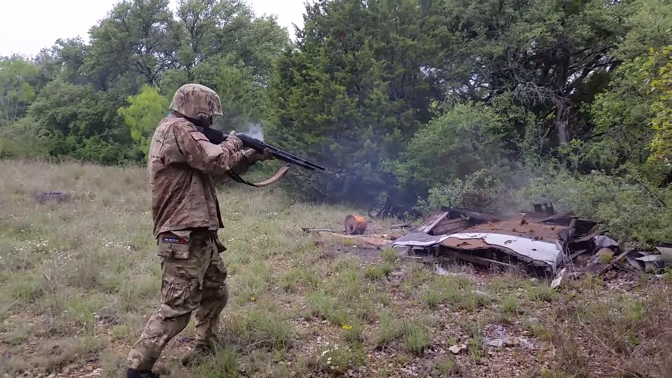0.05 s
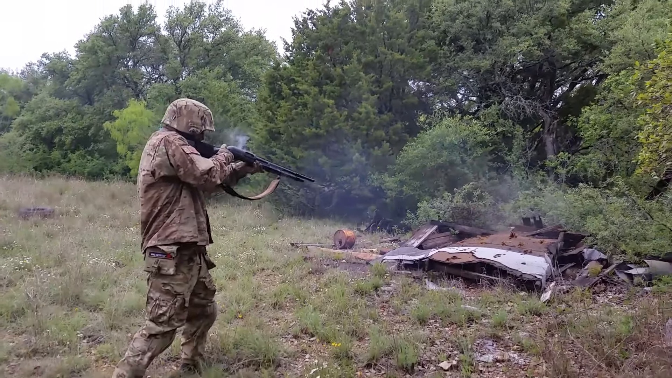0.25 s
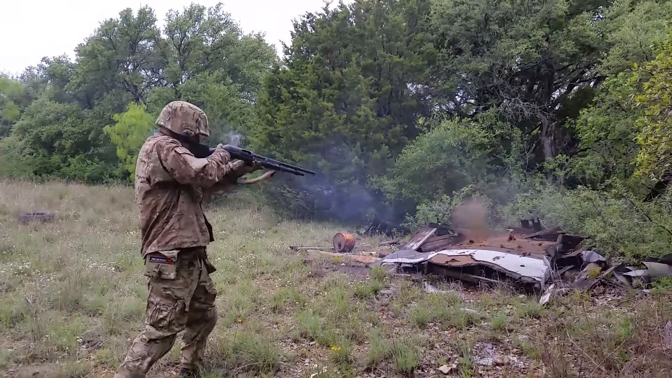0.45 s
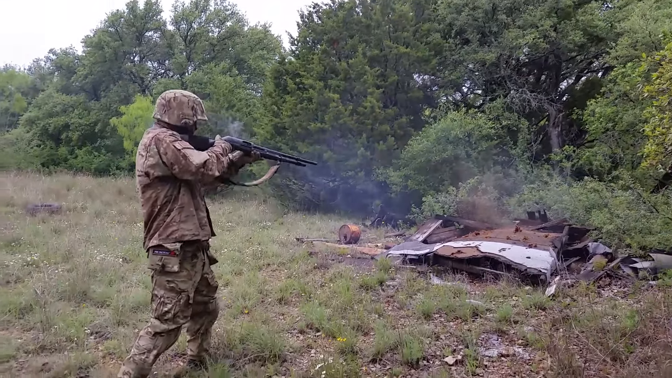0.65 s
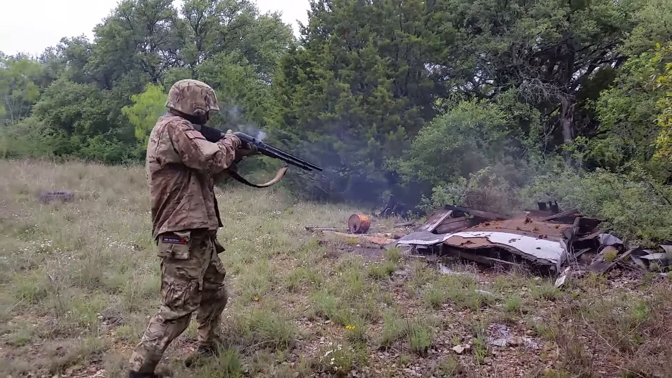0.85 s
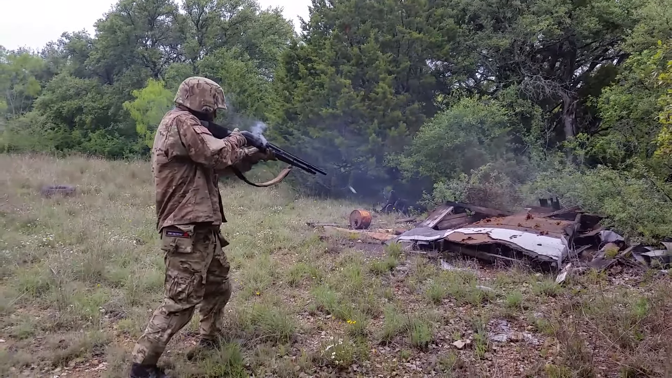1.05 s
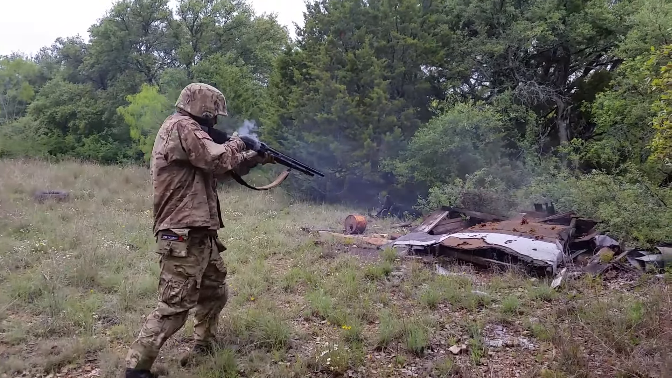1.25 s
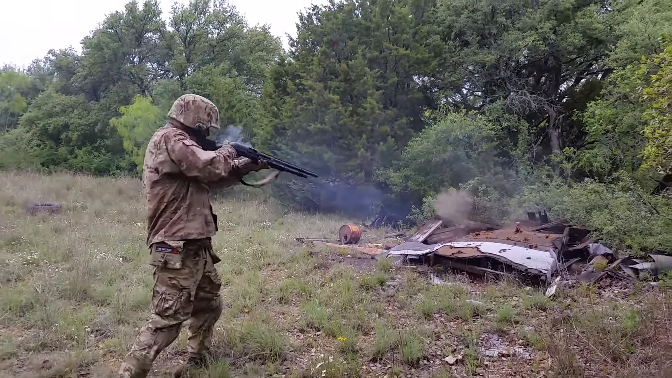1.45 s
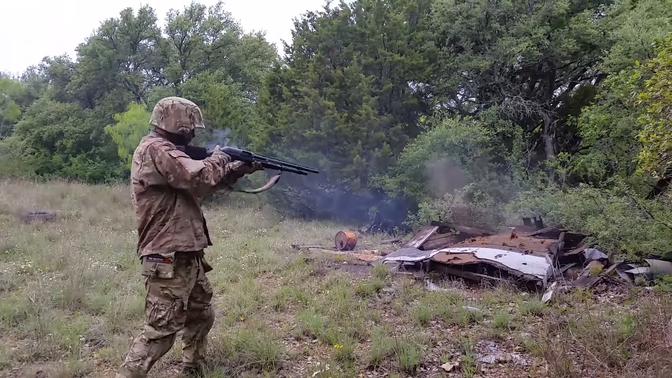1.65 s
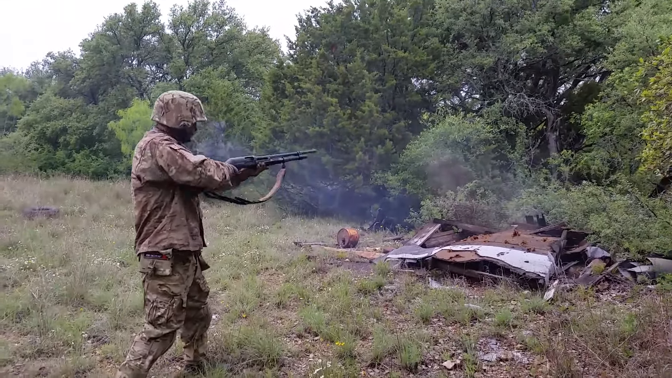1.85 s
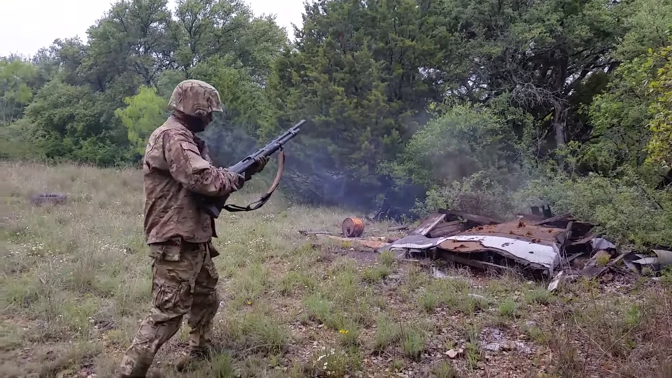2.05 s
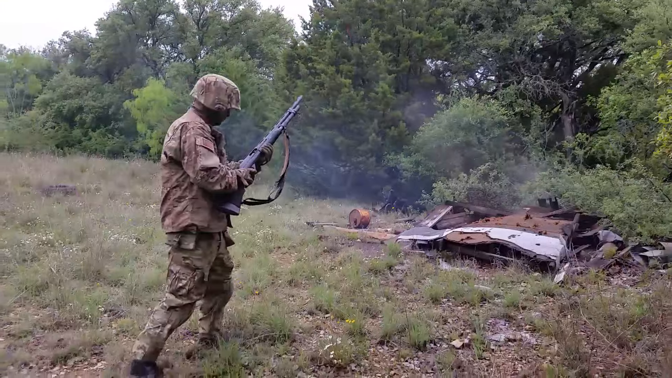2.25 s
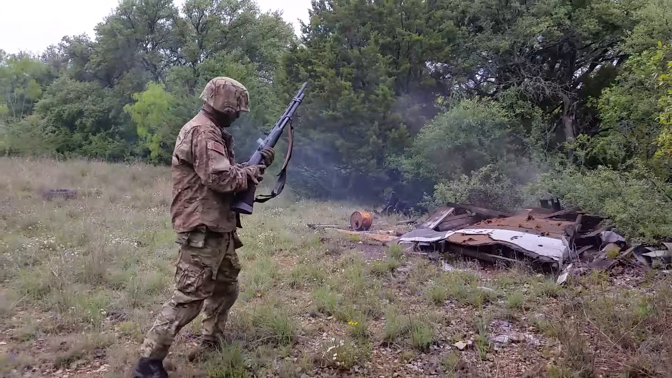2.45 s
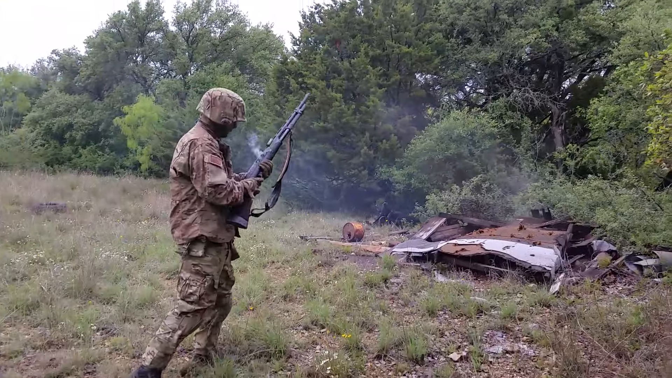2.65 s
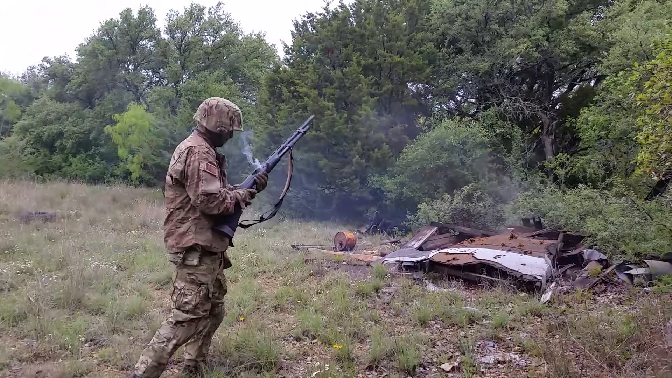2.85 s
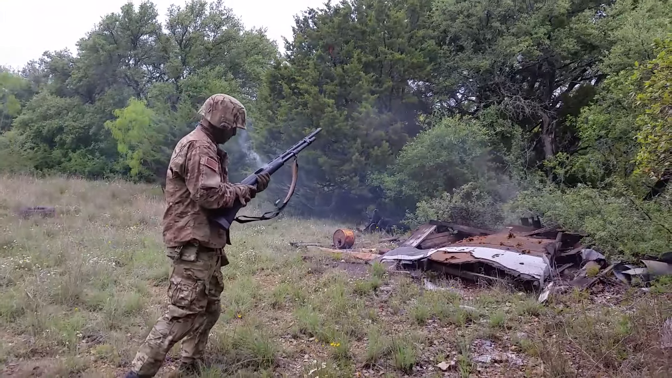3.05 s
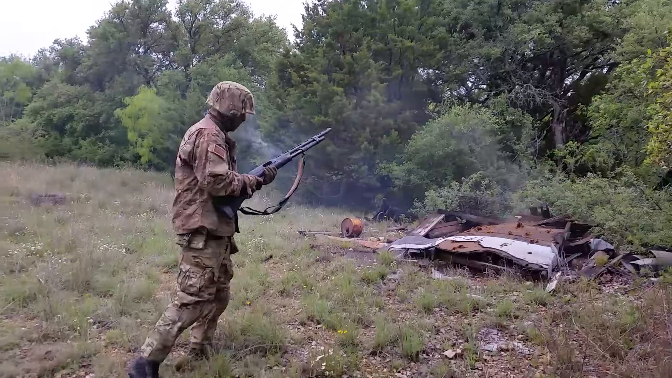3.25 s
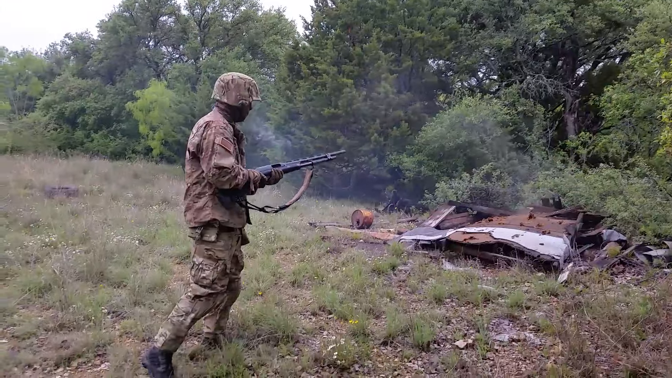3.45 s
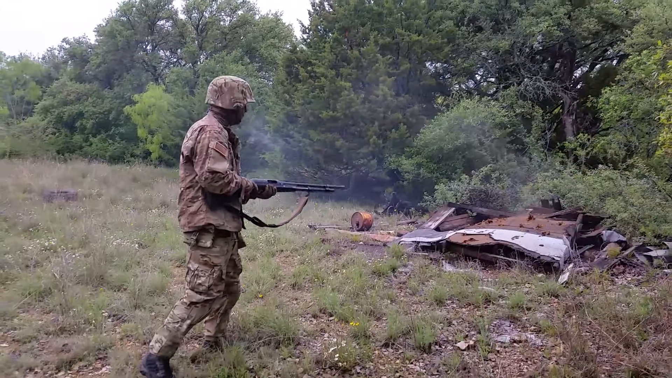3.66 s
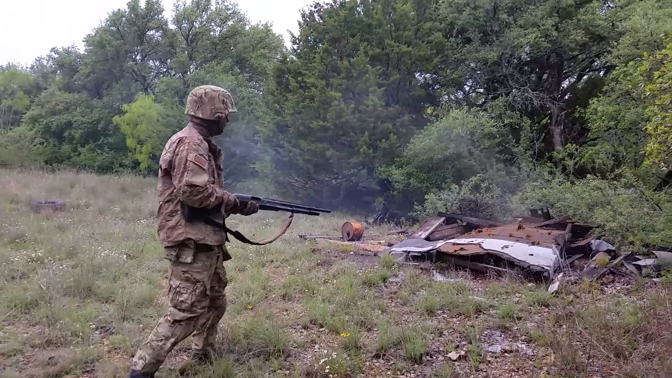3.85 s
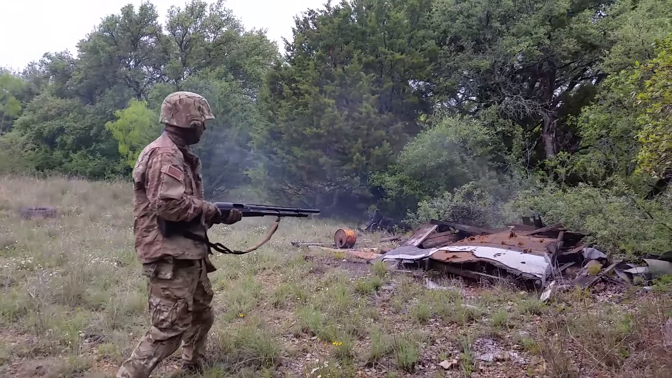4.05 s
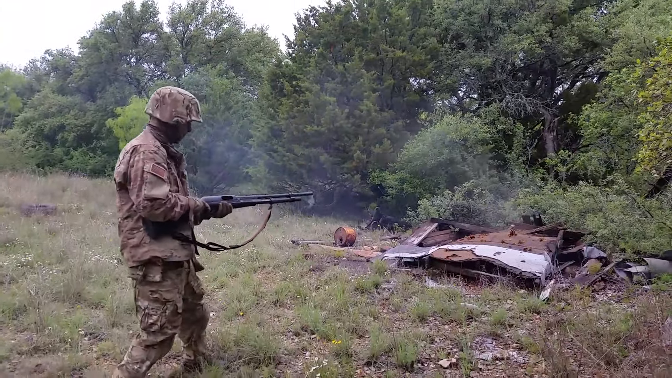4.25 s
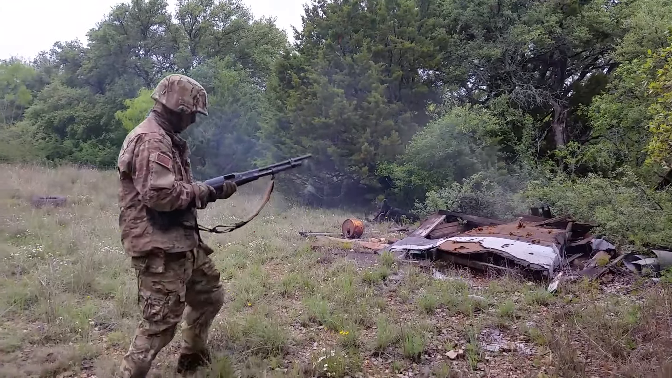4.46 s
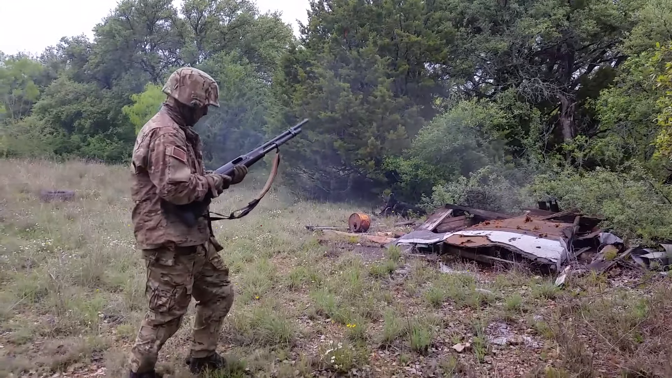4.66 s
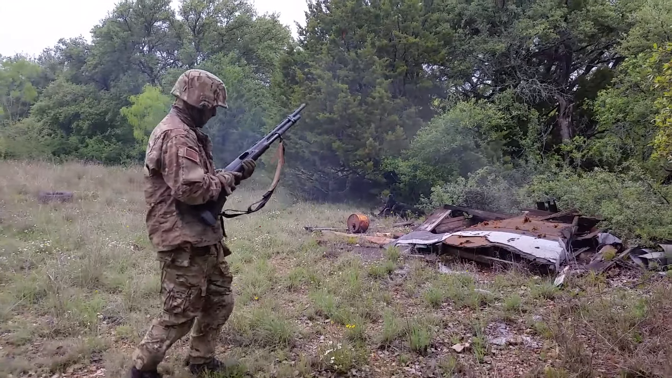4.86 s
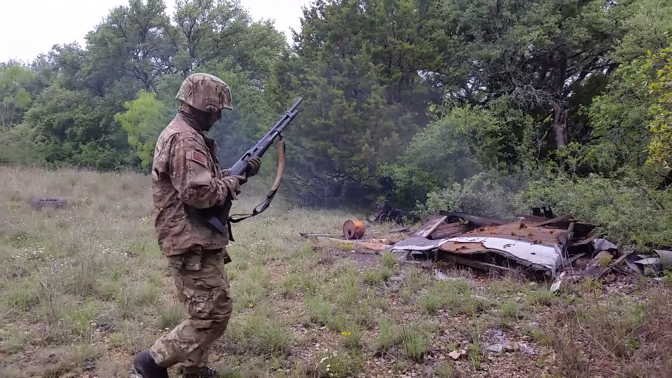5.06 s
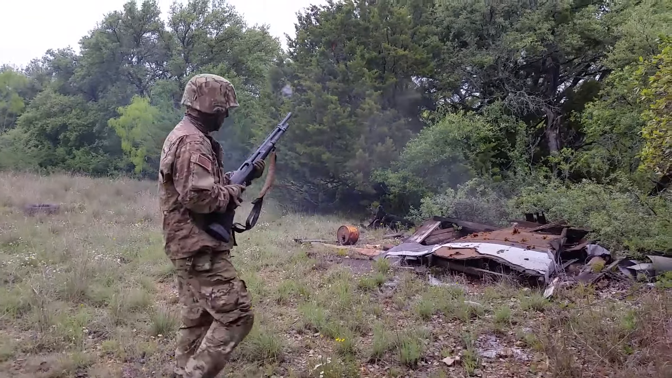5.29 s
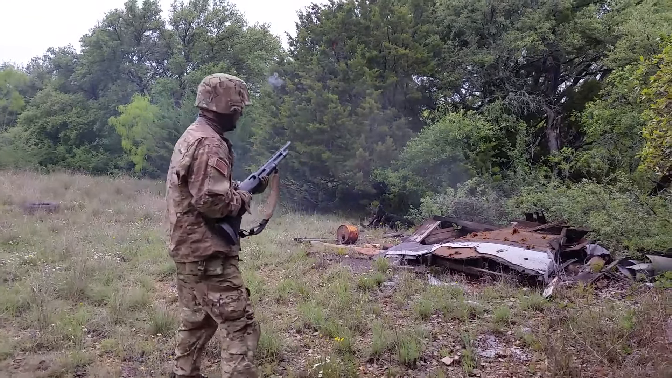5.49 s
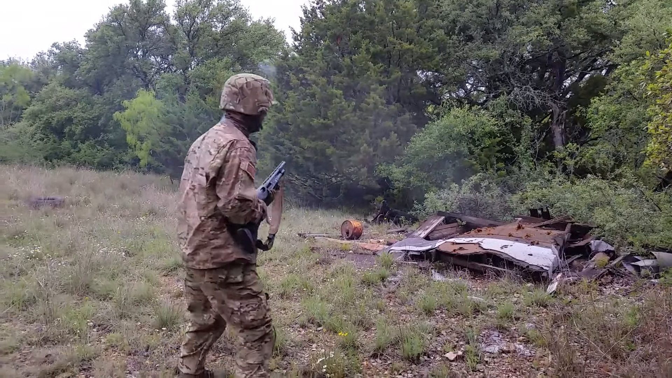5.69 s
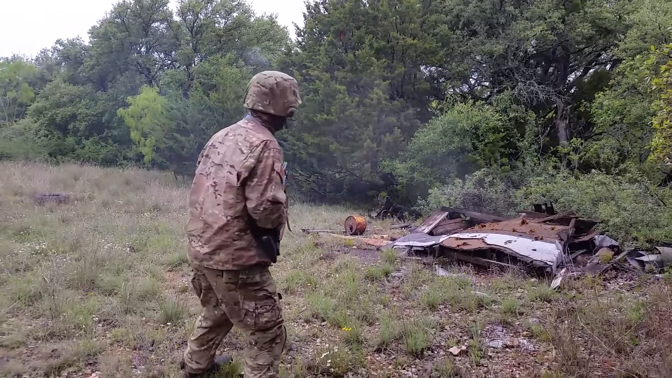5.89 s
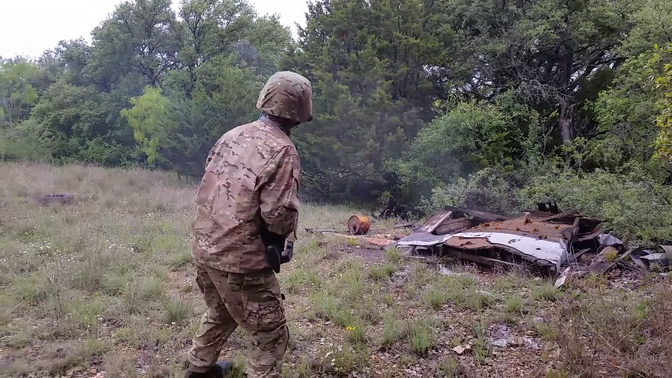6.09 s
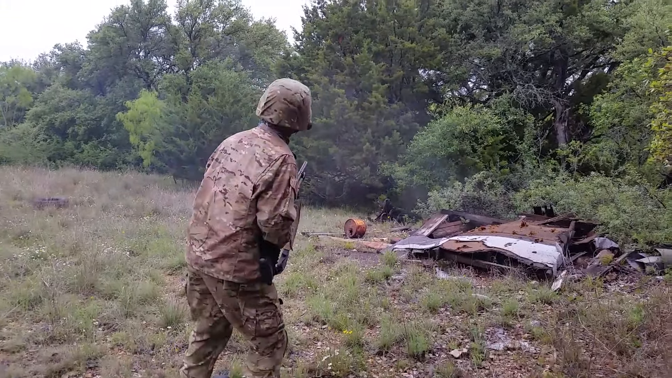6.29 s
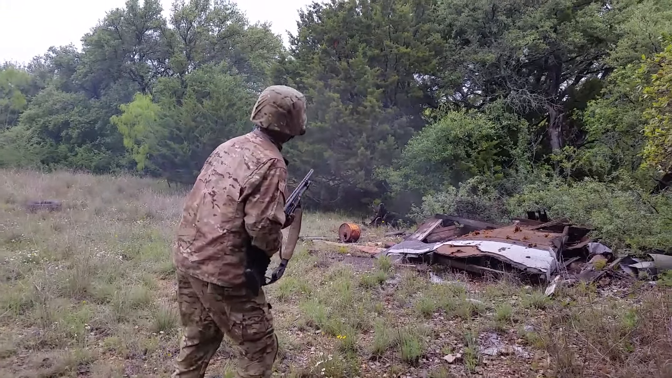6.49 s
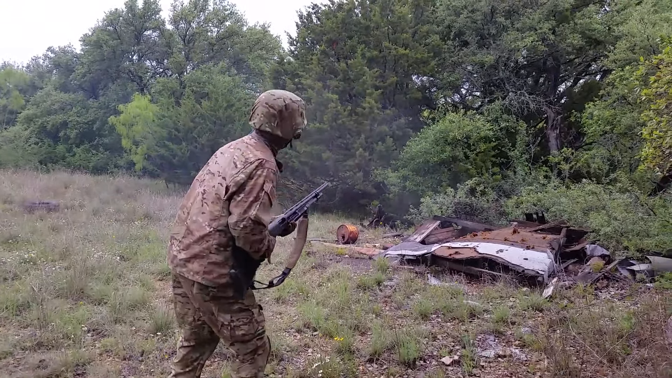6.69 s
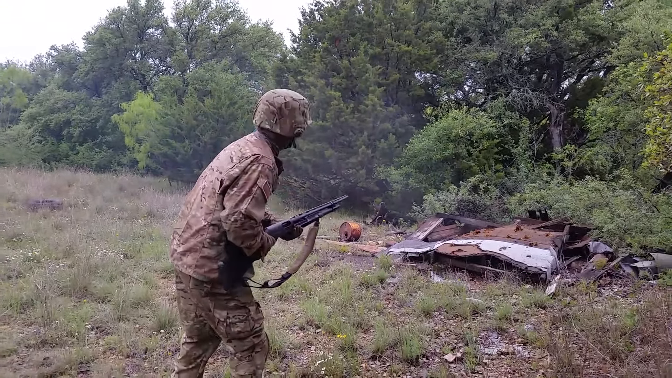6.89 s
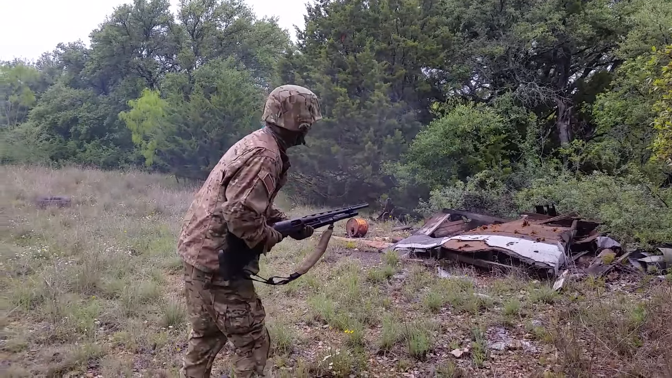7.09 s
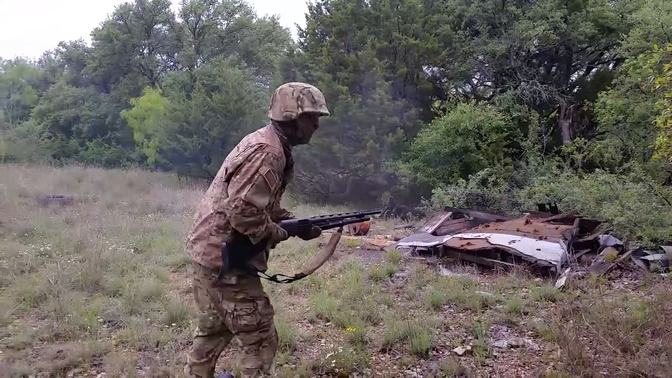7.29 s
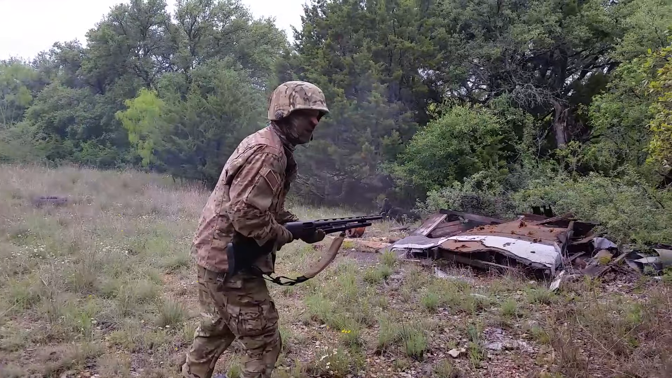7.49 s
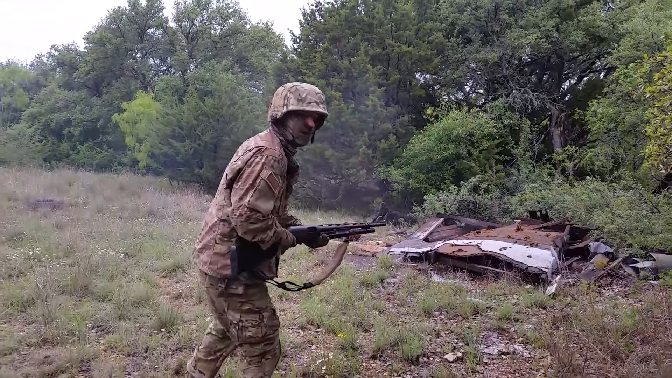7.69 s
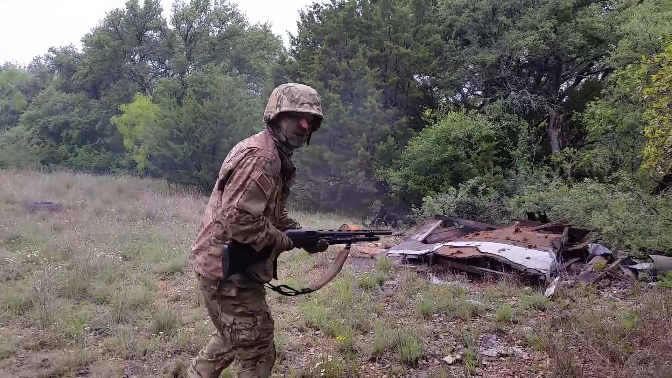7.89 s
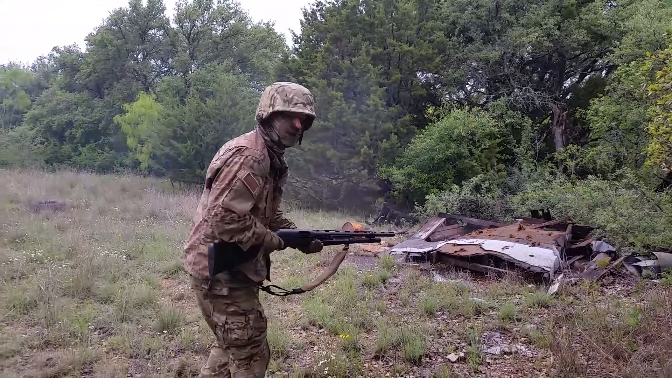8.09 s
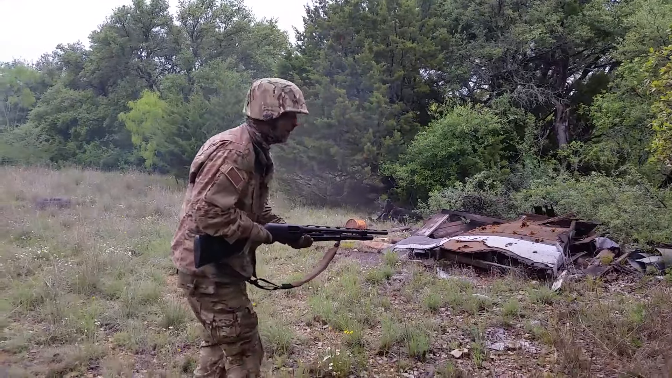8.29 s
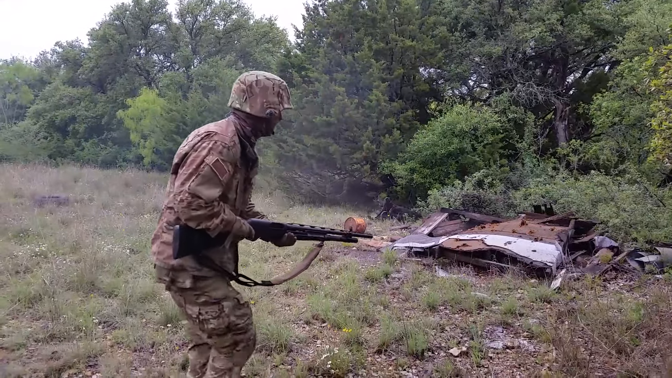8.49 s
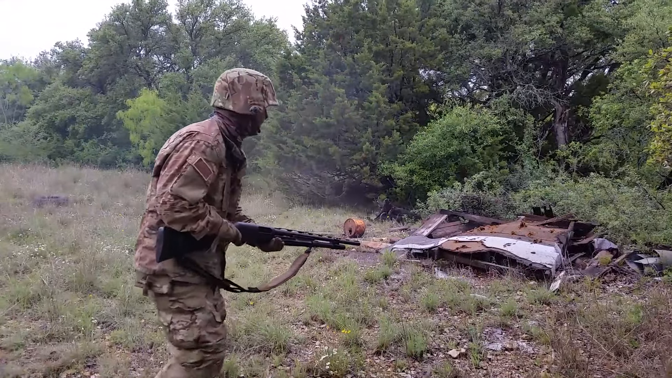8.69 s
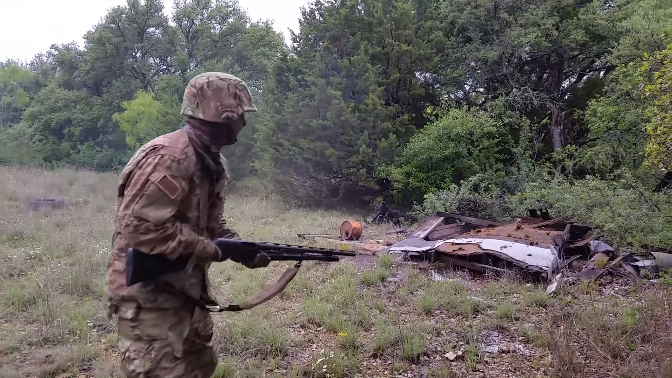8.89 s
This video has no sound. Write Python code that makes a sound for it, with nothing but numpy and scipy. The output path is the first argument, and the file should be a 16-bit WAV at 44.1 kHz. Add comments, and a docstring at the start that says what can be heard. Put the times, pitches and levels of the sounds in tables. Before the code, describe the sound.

At 0 s the tail of an earlier shotgun blast rolls among trees while the pump action clacks and slams, about 0.02 to 0.15 s. A loud, dense blast hits at 0.58 s, with slapping tree echoes and a dull woodland roll; the fore-end is racked at 0.93 to 1.25 s. A second blast at 1.6 s decays likewise. The action is worked again around 2.5 to 2.65 s, softer. The background, pushed down by the shots, swells back: soft air, low rumble, high insects, faint distant engine hum. Tiny rising bird whistles come at 2.5, 5, 5.75, 6.1 and 6.5 s, with a longer level one at 4.3 s. Ticks and a light step at 3.6 s. At 5.2 to 5.35 s comes the hardest steel rack, a sharp double crack. Then quiet dry-grass swishes, a tick at 6.9 s, and clearer footfalls and twig ticks at 8.15 to 8.7 s.

```python
"""Pump shotgun in a meadow

A shot is still rolling away among trees; two more follow. Blasts and echoes are shaped noise.
The action is racked between shots and twice after them, the last time hardest: noise bursts through steel.
Then the shooter walks through dry grass: swishes, ticks and thuds of noise. A bird whistles in sine notes.
Insects and air are filtered noise, a distant engine hums; this background sinks after loud sounds and swells back."""
import sys
import numpy as np
from scipy import signal
from scipy.fft import rfft, irfft, next_fast_len
from scipy.io import wavfile

SR = 44100
rng = np.random.default_rng(int(sys.argv[2]) if len(sys.argv) > 2 else 0)


def materialize(psi):
    """Save the field psi as 16-bit PCM at rate SR to the path in sys.argv[1].

    A 1-D psi becomes a single channel; in a 2-D psi each row is a channel.
    """
    bounded = np.clip(np.atleast_2d(psi).T, -1, 1)
    quanta = np.round(bounded * 32767).astype(np.int16)
    wavfile.write(sys.argv[1], SR, quanta)


N = 394248
TIME = np.arange(N) / SR

# All levels below are relative settings. Columns of every spectrum: f/Hz, level per Hz/dB.

# the shots: t/s, level/dB, treble lift/dB, strength of the echoes/dB
SHOTS = [(-0.48, -17, 12.5, -3), (0.576, -15.5, -3.5, -1), (1.602, -15.5, -1.5, 0.5)]
# spectrum of the blast scattered by grass and brush
BLAST_SPECTRUM = [(20, -18), (45, -11.5), (85, -2.5), (175, 4.5), (255, -6.5), (330, -3.5), (480, -6.5),
                  (800, -3.5), (1350, -5.5), (2400, -11), (5800, -13.5), (9000, -6.5), (12000, -7.5),
                  (14500, -13.5)]
# how fast the blast dies away: f/Hz, time to fall 60 dB/s
BLAST_T60 = [(80, 0.44), (300, 0.38), (1200, 0.48), (4000, .52), (8000, 0.45), (14000, 0.29)]
# how long the blast holds its strength: f/Hz, time/s
BLAST_HOLD = [(80, 0.032), (300, 0.077), (1200, 0.084), (4000, 0.14), (12000, 0.13)]
# where the blast lies between the ears: f/Hz, left over right/dB
BLAST_PAN = [(60, -2.5), (110, 0), (200, -0.5), (380, 0.5), (700, 2.5), (1290, 3), (2370, 2), (4380, -5),
             (8090, 1.5), (14900, 2)]
# spectrum of the roll of the woods
ROLL_SPECTRUM = [(40, -24), (140, 3), (350, -13), (650, -9), (1000, -2), (2500, -5.5), (5000, -20.5),
                 (12000, -29.5)]
# how fast the roll dies away: f/Hz, time to fall 60 dB/s
ROLL_T60 = [(100, 2.4), (400, 1.9), (1100, 1.48), (3000, 1.3), (6000, 0.46), (12000, .6)]
# the nearest trees answer every shot: delay/s, level/dB
NEAR_ECHOES = [(0.016, -20.5), (0.030, -20), (0.069, -21), (0.103, -18), (0.151, -24), (0.226, -33)]
# trunks deeper in the woods answer at random, weaker with delay
DEEP_FROM_S, DEEP_TO_S, DEEP_DB, DEEP_LOSS_DB_PER_S = 0.26, 0.58, -37, 35
# far wooded slopes answer every shot softly: delay/s, level/dB
FAR_ECHOES = [(0.71, -60.5), (0.94, -72)]
# spectrum of that far answer
FAR_SPECTRUM = [(200, -13), (650, -10.5), (900, -2.5), (1200, 0.5), (1700, -10), (2600, -17), (5000, -41)]

# strokes of the fore-end: a clack as it breaks free, a growing rub, a slam at the stop that rebounds:
# start t/s, stop t/s, first clack/dB, final rub/dB, slam/dB, bass lift/dB, loss per rebound/dB
STROKES = [(0.051, 0.132, -32, -37.5, -19, 0, 6.5), (0.934, 0.967, -30.5, -33.5, -17.5, -7, 14),
           (1.146, 1.227, -30, -37, -25.5, -2, 1.5), (2.546, 2.622, -38, -40.5, -23.5, -2, 11),
           (5.211, 5.24, -35, -40, -24, 5.5, 13), (5.28, 5.326, -16, -33, -14, -4.5, 0)]
# single clacks of latch, shell lifter and bolt: t/s, level/dB, bass lift/dB
CLACKS = [(0.024, -41, 5), (0.996, -21.5, 2), (1.116, -38.5, 6), (2.462, -56, 10), (2.515, -48.5, 7.5),
          (2.568, -33, -10), (2.598, -32, 3.5), (5.184, -51, 9), (5.229, -37, 7), (5.302, -20.5, 2.5),
          (5.310, -25, 6)]
# the hand takes up the slack before a stroke and lets go after it (time constants of the rub)
SLACK_S, RUB_RELEASE_S = 0.0098, 0.0072
REBOUND_S = 0.009
RATTLE_DB = 3   # loose parts rattle during a stroke, this far above its final rub
# spectrum of the steel parts
STEEL_SPECTRUM = [(150, -38.5), (250, -8), (531, -9.5), (801, -4), (968, -7), (1560, -3.5), (2240, -10.5),
                  (3270, -8.5), (4520, -6), (5190, -11), (9770, -3), (11400, -4), (13100, -4.5),
                  (14200, -6), (15000, -9)]
# resonances of the receiver: f/Hz, width/Hz, level over the rest/dB
RECEIVER = [(780, 290, -5.5), (1280, 130, -8.5), (1920, 220, -8), (2865, 730, -7), (8460, 160, -5.5),
            (10630, 460, -13)]
# dry snaps of the trigger group: t/s, level/dB
TRIGGER_SNAPS = [(0.506, -56), (1.532, -36)]
# their ringing tones: f/Hz, level/dB, time to fall 60 dB/s
TRIGGER_MODES = [(1326, 1.5, 0.032), (1510, -8, .02), (2700, -12, 0.01), (5600, -9, .01)]

# a leg sweeps through the grass: peak t/s, level/dB
LEG_SWEEPS = [(3.66, -68), (4.59, -67.5), (4.76, -54), (6.38, -64), (7.931, -61), (8.17, -54.5),
              (8.68, -59), (8.82, -74)]
SWEEP_RISE_DB_PER_S, SWEEP_FALL_DB_PER_S = 122, 61.5
# stalks never quite stop swishing while the shooter walks
WALK_FROM_S, WALK_SWISH_DB = 3.5, -81.5
# twigs and gear tick: t/s, level/dB, level of the hard knock above that/dB
TICKS = [(0.455, -64, -7.5), (2.837, -54, 0), (3.633, -37.5, -8), (4.942, -42, -12.5), (6.907, -44.5, -2),
         (8.162, -37, -10), (8.517, -60.5, 5), (8.645, -53, -6)]
# footfalls: t/s, level/dB
STEPS = [(3.625, -55), (8.152, -43.5), (8.51, -51.5), (8.64, -49)]
# spectrum of dry grass
GRASS_SPECTRUM = [(3240, -36.5), (5500, -10), (6930, -17), (8880, 2.5), (10800, 0.5), (13300, -2.5),
                  (14000, -1), (15000, -18)]
# spectrum of the hard knock of twig or gear
KNOCK_SPECTRUM = [(300, -9), (900, -2), (1300, 2), (2200, -7), (5000, -13), (14000, -21)]
# spectrum of a boot on soil
THUD_SPECTRUM = [(100, -16), (280, 7), (600, -5.5), (1250, -13), (2000, -25), (10000, -22)]

# a bird's call, a soft low note and then a high one: t of the high note/s, length/s, starting level/dB
BIRD_CALLS = [(2.47, 0.034, -60), (4.957, 0.08, -69.5), (5.75, 0.06, -70), (6.14, 0.055, -70),
              (6.531, 0.059, -64)]
HIGH_NOTE_HZ, LOW_NOTE_HZ = 2900, 1780   # before they rise
NOTE_RISE = 0.19   # the high note climbs by this share of its pitch, the low note by half as much
LOW_LEAD_S, LOW_NOTE_DB = 0.08, -8.5   # the low note against the high one
# one long whistle that does not climb
WHISTLE_S, WHISTLE_LENGTH_S, WHISTLE_HZ, WHISTLE_DB = 4.32, 0.32, 2190, -76.5

# spectrum of the low rumble
RUMBLE_SPECTRUM = [(20, -13), (45, -6), (85, 1), (125, -3), (170, -8.5), (230, -15.5), (400, -51.5)]
# spectrum of air in the trees, plus a thin microphone hiss at the very top
AIR_SPECTRUM = [(120, -9), (220, -4.5), (350, -0.5), (550, -4), (950, -5.5), (1300, -12), (2000, -16),
                (2700, -23.5), (5000, -28), (8000, -42), (13300, -35.5), (14500, -19.5)]
# spectrum of the insect chorus
INSECT_SPECTRUM = [(2500, -28), (3500, -12), (3900, -6.5), (4150, 1), (4500, -5), (5200, -15),
                   (7000, -33.5)]
RUMBLE_DB, AIR_DB, INSECTS_DB = -57, -62, -68   # before the dips
# tones of the distant engine: f/Hz, level/dB
ENGINE_TONES = [(96.9, -3.5), (140.5, -1), (306.8, -20), (457.6, -21.5)]
# the engine over time: t/s, level/dB, lift of its upper tones/dB
ENGINE_LEVEL = [(3.7, -54.5, -9), (4.3, -59.5, -3), (4.8, -56, -3.5), (6.6, -55, -2), (7.3, -62, 5.5),
                (8.1, -57.5, 5.5), (8.94, -58.5, -1.5)]
# the background sinks after loud sounds: start t/s, depth limit of this dip/dB (deep dips turn back before
# reaching it)
SINKS = [(-0.48, 32), (0.581, 29), (1.6, 23), (2.62, 13), (5.331, 12)]
# the dip falls at this rate until it meets the swell back, which would leave the full depth this long after the
# dip begins; deep dips turn back sooner, before reaching it
SINK_DB_PER_S, SWELL_AFTER_S, SWELL_DB_PER_S = 26.5, 0.8, 30
DEEPEST_DB = 23   # limit for dips that add up
AIR_SINKS, RUMBLE_SINKS, ENGINE_SINKS = 0.66, 0.45, 0.36   # shares of the dip that these take
# how alike noise is at the two ears: f/Hz, likeness (0 to 1)
LIKENESS = [(35, 0.05), (70, 0.99), (140, 0.6), (290, .65), (640, 0.28), (1400, 0.03), (15000, 0.03)]
CUTOFF_HZ = 14900


def from_db(db):
    """Turn decibels into gain."""
    return 10 ** (np.asarray(db) / 20)


def rms_one(x):
    """Scale to an rms of one."""
    return x / np.sqrt(np.mean(x ** 2) + 1e-20)


def at_hz(points, hz):
    """Read a curve at any frequency, with straight lines on a log-frequency axis."""
    f, value = np.transpose(points)
    return np.interp(np.log(np.maximum(hz, 1)), np.log(f), value)


def in_time(table):
    """Read the columns of a time curve, sample by sample."""
    s, *columns = np.transpose(table)
    return [np.interp(TIME, s, column) for column in columns]


def pan(db):
    """Left and right gains; positive dB leans left."""
    return from_db(np.array([[db], [-db]]) / 2)


def add(out, s, x):
    """Mix a sound in at time s, which may lie before the start."""
    i = round(s * SR)
    x, i = x[..., max(-i, 0):], max(i, 0)
    out[..., i:i + x.shape[-1]] += x[..., :N - i]


def later(x, lag_s):
    """Delay by a fraction of a millisecond."""
    return np.interp(TIME - lag_s, TIME, x)


def drift(rate, size):
    """Wander at random around 0: straight lines between normal draws, `rate` draws per second."""
    knots = rng.standard_normal(size // 20 + 2)
    return np.interp(np.arange(size) * rate / SR, np.arange(len(knots)), knots)


def stereo_noise(size):
    """White noise, most alike at both ears in the bass and nearly unrelated in the treble."""
    padded = next_fast_len(size)
    alike = at_hz(LIKENESS, np.fft.rfftfreq(padded, 1 / SR))
    mid, side = rfft(rng.standard_normal((2, padded)))
    both = np.sqrt(1 + alike) * mid + np.sqrt(1 - alike) * side * [[1], [-1]]
    return irfft(both, padded)[:, :size]


def colour(x, spectrum, size=4096):
    """Filter to the given spectrum without ringing ahead (minimum phase); white noise keeps its power."""
    cepstrum = irfft(np.log(from_db(at_hz(spectrum, np.fft.rfftfreq(size, 1 / SR)))))
    # folding the cepstrum forward makes the filter act only after the sound
    cepstrum[1:size // 2] *= 2
    cepstrum[size // 2 + 1:] = 0
    response = irfft(np.exp(rfft(cepstrum)))
    return signal.oaconvolve(x, response[None] / np.linalg.norm(response))[:, :x.shape[1]]


def band(x, low_hz, high_hz):
    """Keep one band of frequencies (Butterworth)."""
    return signal.sosfilt(signal.butter(2, [low_hz, high_hz], "band", fs=SR, output="sos"), x)


def bursts(rows, t60):
    """Loudness curve that jumps at each (t/s, level/dB) and falls 60 dB in t60 seconds."""
    kicks = np.zeros(N)
    for s, db in rows:
        kicks[round(s * SR)] += from_db(db)
    return signal.lfilter([1], [1, -from_db(-60 / (t60 * SR))], kicks + 1e-18)


def scatter(x, t60, wet_db):
    """Blurred tail of countless small reflections: decaying noise that fades in within milliseconds."""
    t = TIME[:SR]
    response = rng.standard_normal((2, SR)) * from_db(-60 * t / t60) * (1 - np.exp(-t / 0.0086))
    return from_db(wet_db) * signal.oaconvolve(x, rms_one(response) / np.sqrt(SR), axes=1)[:, :N]


def gunfire(echo_s=0.0034, echo_low_hz=170, echo_high_hz=1750, echo_db=-2, far_swell_s=0.049):
    """Blasts, then distinct, duller echoes off trees and soft noise swells from far slopes."""
    out, t = np.zeros((2, N)), TIME[:SR // 2]
    for s, db, treble_db, answer_db in SHOTS:
        add(out, s, from_db(db) * shot(treble_db))
        deep_delays = rng.uniform(DEEP_FROM_S, DEEP_TO_S, size=5)
        deep = [(delay, DEEP_DB - DEEP_LOSS_DB_PER_S * (delay - DEEP_FROM_S)) for delay in deep_delays]
        for delay, level_db in NEAR_ECHOES + deep:
            puff = t * np.exp(-t / echo_s) + 1e-18
            slap = band(stereo_noise(len(t)) * puff, echo_low_hz, echo_high_hz)
            slap = slap / slap[:, :SR // 100].std()
            add(out, s + delay, from_db(answer_db + level_db + echo_db) * slap * pan(1.7))
        for delay, level_db in FAR_ECHOES:
            swell = t / far_swell_s * np.exp(1 - t / far_swell_s) * from_db(1.8 * drift(79, len(t)))
            add(out, s + delay, from_db(level_db) * swell * colour(stereo_noise(len(t)), FAR_SPECTRUM))
    return out


def shot(treble_db, rise_s=0.0065, roll_db=-17, lumpy_db=1.5, roll_lumpy_db=3, lumpy_below_hz=2500,
         woods_end_s=0.61):
    """One blast in bands of noise: dense near scatter that holds and then falls, plus the roll of the woods."""
    size, edges = 2 * SR, np.geomspace(25, 16000, 25)
    t, out = TIME[:size], np.zeros((2, size))
    centres, share = np.sqrt(edges[1:] * edges[:-1]), np.diff(edges) / (SR / 2)
    near, far = from_db(at_hz(BLAST_SPECTRUM, centres)), from_db(at_hz(ROLL_SPECTRUM, centres))
    # bring both spectra to the same total power
    near, far = near / np.sqrt(share @ near ** 2), far / np.sqrt(share @ far ** 2)
    white, clumps = [stereo_noise(size), stereo_noise(size)], drift(170, size)
    # the roll thins out once the last near trees have answered
    depth = 1 / np.hypot(1, (t / woods_end_s) ** 10)
    for k, hz in enumerate(centres):
        hold = at_hz(BLAST_HOLD, hz)
        # trunks send the lows back in lumps, leaves send the treble back smoothly
        lumpy = 1 / (1 + (hz / lumpy_below_hz) ** 2)
        near_db = -60 * (np.hypot(t, hold) - hold) / at_hz(BLAST_T60, hz)
        near_db = near_db + lumpy * lumpy_db * clumps + treble_db * (1 - lumpy)
        far_db = roll_db - 60 * t / at_hz(ROLL_T60, hz) + roll_lumpy_db * drift(35, size)
        level = np.hypot(near[k] * from_db(near_db), far[k] * from_db(far_db) * depth)
        # play the noise backwards: its settled end comes first, so the bass starts at once
        noise = band(white[k % 2], edges[k], edges[k + 1])[:, ::-1]
        out += noise * level * pan(at_hz(BLAST_PAN, hz))
    return out * (1 - np.exp(-(t / rise_s) ** 2))


def pump_action(clack_t60=0.02, grit_db=5, spread=0.64, lag_s=0.00009, split_hz=2200, top_hz=10500,
                slam_s=0.00067, vary_db=2):
    """Steel parts rub and slam as noise; the receiver rings briefly and reverberant tails follow."""
    rub, contacts = strokes()
    blows = contacts + CLACKS
    light = bursts([(s, db) for s, db, bass_db in blows], clack_t60)
    heavy = bursts([(s, db + bass_db) for s, db, bass_db in blows], clack_t60)
    contact, give = 0, np.exp(-1 / (slam_s * SR))
    registers = ((heavy, 220, split_hz), (light, split_hz, top_hz), (light, top_hz, SR / 2.2))
    for hits, low_hz, high_hz in registers:
        # each register varies by itself, so every contact sounds a little different
        impact = signal.lfilter([1 - give], [1, -give], hits) * from_db(vary_db * drift(150, N))
        force = np.hypot(impact, rub * from_db(grit_db * drift(500, N)))
        shared = force * rng.standard_normal(N)
        # the gun is to the left, so the right ear hears it later
        both = np.array([shared, later(shared, lag_s)]) + spread * force * rng.standard_normal((2, N))
        contact = contact + band(both, low_hz, high_hz) / np.hypot(1, spread)
    rings = 0
    for hz, width, db in RECEIVER:
        rings = rings + from_db(db) * signal.lfilter(*signal.iirpeak(hz, hz / width, fs=SR), contact)
    dry = colour(contact + rings, STEEL_SPECTRUM) * pan(2.8)
    # a short bright reverberant tail, and a longer, weaker one of the whole sound
    bright = signal.sosfilt(signal.butter(1, 1200, "high", fs=SR, output="sos"), dry)
    return dry + scatter(bright, t60=0.19, wet_db=-6) + scatter(dry, t60=0.58, wet_db=-17)


def strokes(swell_db=13, count=3):
    """Growing rub of the fore-end, and each contact it makes as (t/s, level/dB, bass lift/dB)."""
    rub, contacts = np.zeros(N), []
    for start, stop, first_db, rub_db, slam_db, bass_db, loss_db in STROKES:
        travel = np.clip((TIME - start) / (stop - start), 0, 1)
        idle = np.maximum(start - TIME, 0) / SLACK_S + np.maximum(TIME - stop, 0) / RUB_RELEASE_S
        rub += from_db(rub_db + swell_db * (travel - 1)) * np.exp(-np.minimum(idle, 20))
        contacts.append((start, first_db, bass_db))
        # loose parts rattle on the way
        contacts += [(start + u * (stop - start), rub_db + RATTLE_DB, bass_db) for u in rng.random(count)]
        # the slam, then its rebounds
        contacts += [(stop + k * REBOUND_S, slam_db - k * loss_db, bass_db) for k in range(count)]
    return rub, contacts


def trigger(crack_db=-2):
    """A sharp noise snap with a short hollow ring of fading sine tones."""
    crack = colour(bursts(TRIGGER_SNAPS, t60=0.066) * rng.standard_normal((2, N)), STEEL_SPECTRUM)
    dry, t = from_db(crack_db) * crack, TIME[:SR // 10]
    for s, db in TRIGGER_SNAPS:
        for hz, level_db, t60 in TRIGGER_MODES:
            add(dry, s, from_db(db + level_db - 60 * t / t60) * np.sin(2 * np.pi * hz * t))
    return dry + scatter(dry, t60=0.3, wet_db=-12)


def walking(crackle_db=3):
    """Stalks swish against the legs, twigs tick and boots thud, all as coloured noise."""
    crackle = from_db(crackle_db * drift(900, N))
    swish = colour(brushing() * crackle * rng.standard_normal((2, N)), GRASS_SPECTRUM)
    snaps = bursts([(s, db) for s, db, knock_db in TICKS], t60=0.018) * rng.standard_normal((2, N))
    knocks = bursts([(s, db + knock_db) for s, db, knock_db in TICKS], t60=0.0086)
    knocks = knocks * rng.standard_normal((2, N))
    ticks = colour(snaps, GRASS_SPECTRUM) + colour(knocks, KNOCK_SPECTRUM)
    thuds = colour(bursts(STEPS, t60=0.1) * stereo_noise(N), THUD_SPECTRUM)
    return swish + ticks + scatter(ticks, t60=0.325, wet_db=-9) + thuds


def brushing():
    """Each sweep of a leg swells quickly and fades more slowly, over a faint steady swish."""
    layers = []
    for s, db in LEG_SWEEPS:
        below_peak_db = np.maximum(SWEEP_RISE_DB_PER_S * (s - TIME), SWEEP_FALL_DB_PER_S * (TIME - s))
        layers.append(from_db(db - below_peak_db))
    before_walk_db = SWEEP_RISE_DB_PER_S * np.maximum(WALK_FROM_S - TIME, 0)
    # the steady swish sinks along with the background
    layers.append(from_db(WALK_SWISH_DB - sinking() - before_walk_db))
    return np.linalg.norm(layers, axis=0)


def bird(wobble=0.012, grow_db=2):
    """Far sine whistles; call notes dwell low and sweep upwards, and the woods blur them all."""
    out, notes = np.zeros((2, N)), [(WHISTLE_S, WHISTLE_LENGTH_S, WHISTLE_HZ, WHISTLE_DB, 0)]
    for s, length, db in BIRD_CALLS:
        notes.append((s - LOW_LEAD_S, length, LOW_NOTE_HZ, db + LOW_NOTE_DB, NOTE_RISE / 2))
        notes.append((s, length, HIGH_NOTE_HZ, db, NOTE_RISE))
    for s, length, start_hz, db, rise in notes:
        u = np.linspace(0, 1, round(length * SR))
        climb = 1 + rise * np.sin(np.pi / 2 * u ** 1.6) ** 2
        hz = start_hz * climb * (1 + wobble * drift(201, len(u)))
        level = from_db(db + grow_db * u) * np.sqrt(np.abs(np.sin(np.pi * u)))
        add(out, s, level * np.sin(2 * np.pi * np.cumsum(hz) / SR))
    return out + scatter(out, t60=0.35, wet_db=0)


def meadow(tree_lag_s=0.00032, tree_share=0.58):
    """Noise for rumble, air in the trees and a chorus of insects, with the hum of a distant engine."""
    down_db = sinking()
    rumble = from_db(RUMBLE_DB - RUMBLE_SINKS * down_db) * colour(stereo_noise(N), RUMBLE_SPECTRUM)
    # part of the rustle comes from the trees on the right and reaches the left ear later
    trees = rng.standard_normal(N)
    from_right = np.array([later(trees, tree_lag_s), trees])
    rustle = np.sqrt(tree_share) * from_right + np.sqrt(1 - tree_share) * stereo_noise(N)
    air = from_db(AIR_DB - AIR_SINKS * down_db) * colour(rustle, AIR_SPECTRUM)
    flicker_db = 1.3 * drift(32, N)
    insects = from_db(INSECTS_DB - down_db + flicker_db) * colour(stereo_noise(N), INSECT_SPECTRUM)
    return (rumble + engine(down_db) + air + insects) * pan(0.67)


def engine(down_db, waver_hz=0.8):
    """Distant hum of a few sine tones that waver in pitch and level."""
    engine_db, upper_db = in_time(ENGINE_LEVEL)
    hum = 0
    for hz, db in ENGINE_TONES:
        lift_db = upper_db * (hz > ENGINE_TONES[0][0])
        level = from_db(db + lift_db + 2 * drift(4, N)) * np.sqrt(2)
        hum = hum + level * np.sin(2 * np.pi * np.cumsum(hz + waver_hz * drift(6, N)) / SR)
    return from_db(engine_db - ENGINE_SINKS * down_db) * hum


def sinking():
    """How many dB the background is down; dips that overlap add up to a limit."""
    total_db = 0
    for s, depth_db in SINKS:
        fall_db = SINK_DB_PER_S * (TIME - s)
        swell_back_db = depth_db - SWELL_DB_PER_S * (TIME - s - SWELL_AFTER_S)
        total_db = total_db + np.clip(np.minimum(fall_db, swell_back_db), 0, depth_db)
    return np.minimum(total_db, DEEPEST_DB)


def scene():
    """Gun, shooter and surroundings together."""
    return gunfire() + pump_action() + trigger() + walking() + bird() + meadow()


def record(dry, ceiling=0.63):
    """Round off the loudest peaks and cut the top of the treble steeply."""
    rounded = ceiling * np.tanh(dry / ceiling)
    return signal.sosfilt(signal.ellip(12, 0.2, 80, CUTOFF_HZ, fs=SR, output="sos"), rounded)


dry = scene()
out = record(dry)
materialize(out)
```